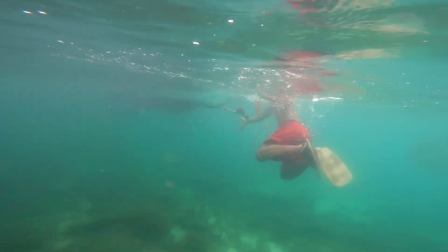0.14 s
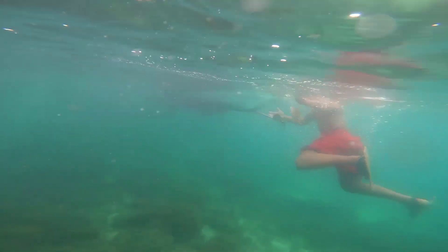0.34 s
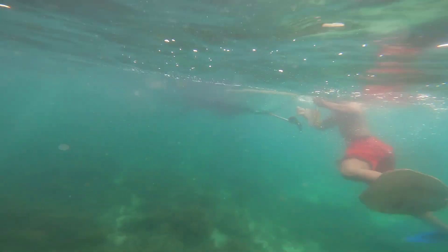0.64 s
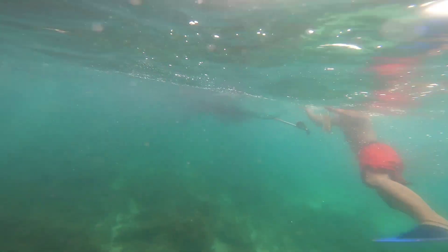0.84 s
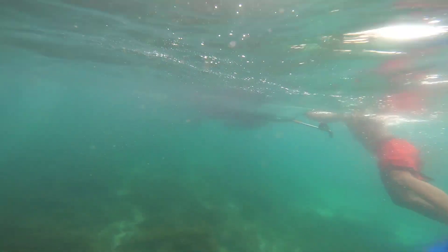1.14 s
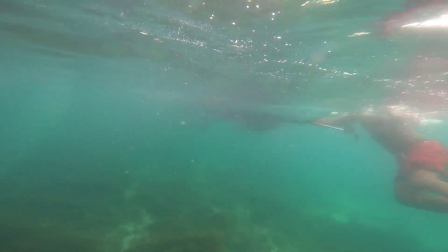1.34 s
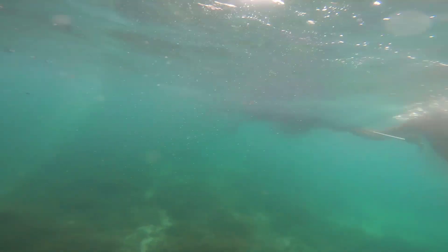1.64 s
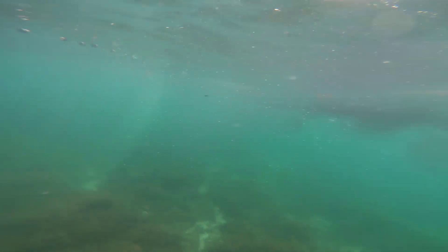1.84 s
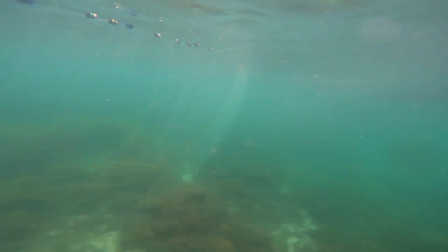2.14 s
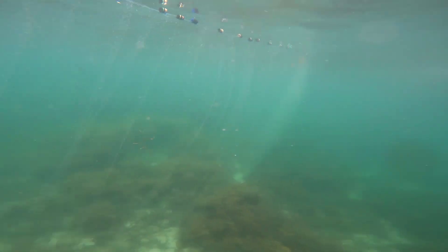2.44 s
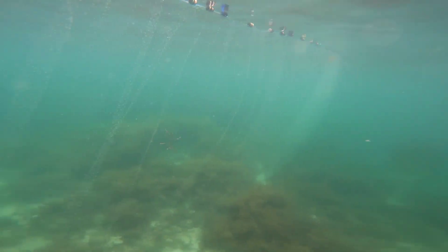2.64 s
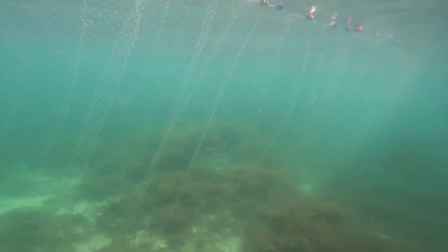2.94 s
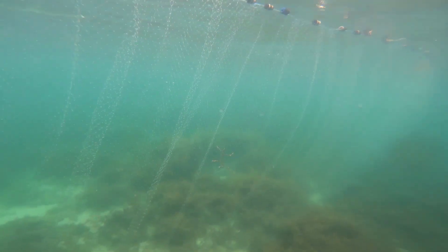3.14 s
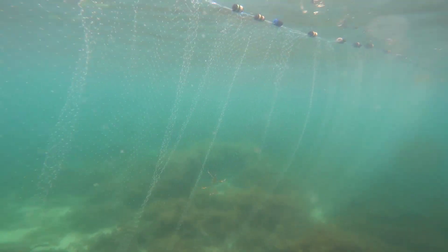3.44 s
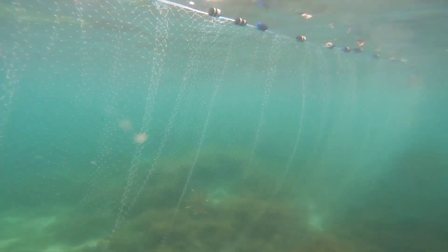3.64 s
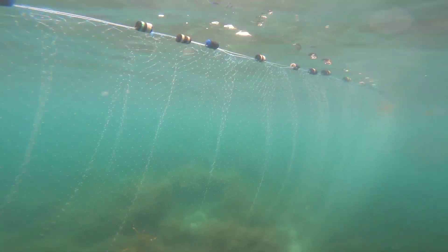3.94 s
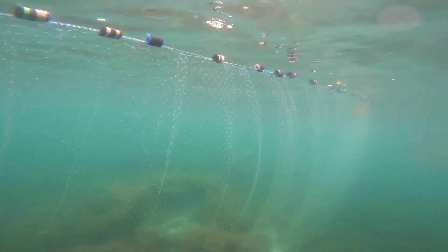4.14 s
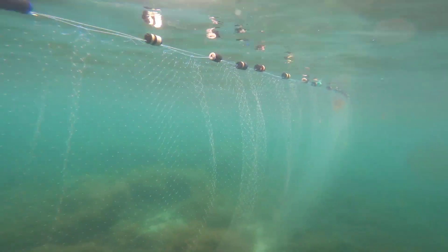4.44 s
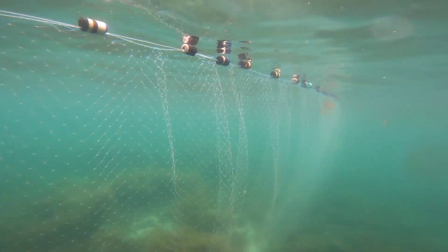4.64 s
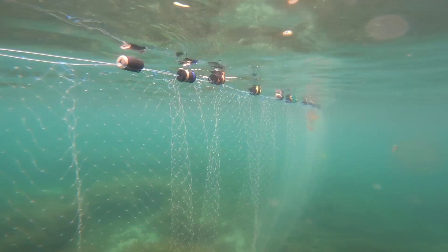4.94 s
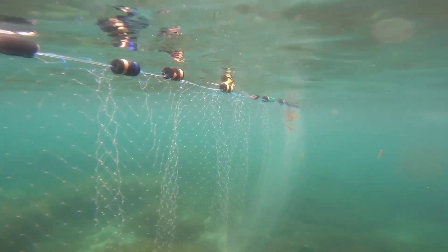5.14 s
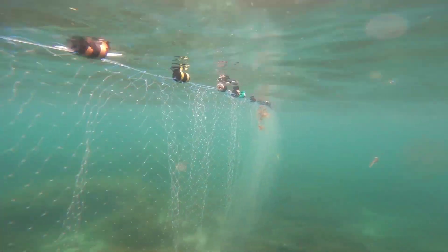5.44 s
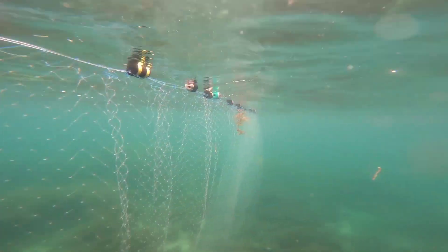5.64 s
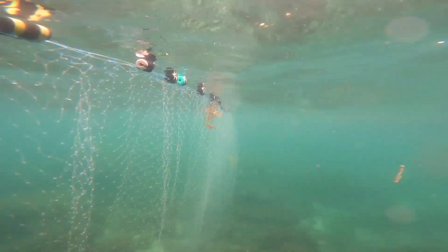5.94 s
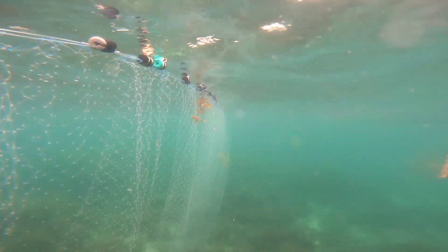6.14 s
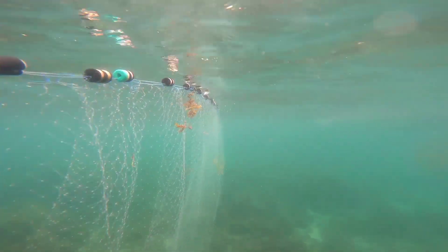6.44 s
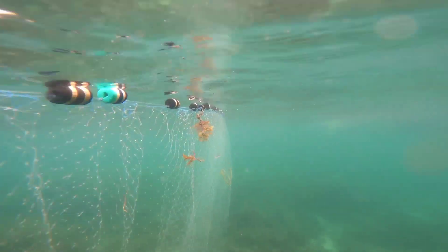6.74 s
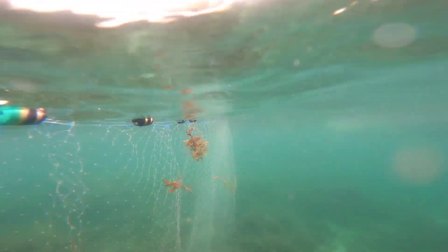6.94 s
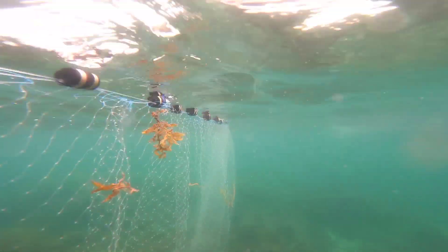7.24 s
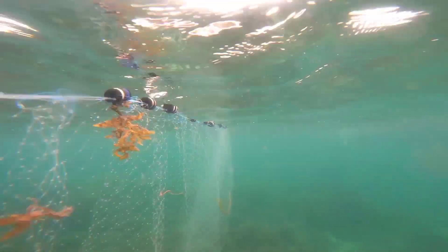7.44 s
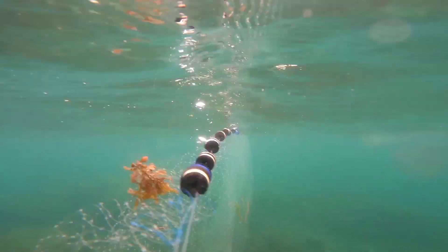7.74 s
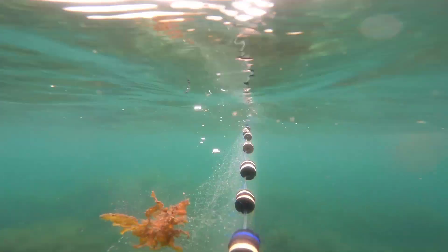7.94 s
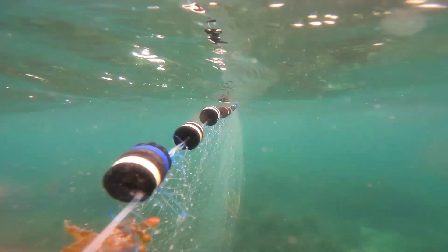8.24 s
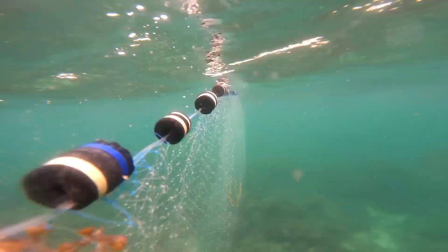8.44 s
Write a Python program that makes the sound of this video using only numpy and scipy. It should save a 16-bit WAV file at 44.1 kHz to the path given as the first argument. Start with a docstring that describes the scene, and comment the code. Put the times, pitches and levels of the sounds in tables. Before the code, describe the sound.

Heard from inside a camera's waterproof housing just under the sea surface, everything is muffled, boxy and close, slightly stronger on the left. A faint frying crackle from reef shrimp continues throughout, with scattered sharp snaps, notable near 1.1, 3.3 and 5.9 s. From 0 to 1.8 s water washes softly with a low hollow murmur. From 1.9 to 4.5 s surges grow stronger, a wavering drone around mid-low pitch swelling with fizz and pops; a deep gulp and soft bump come at 2.3 s, smaller gulps near 3.0 and 3.2. A longer surge runs 4.8 to 5.5, then a lull. At 6.1 s a rapid cluster of gulps, bubbles and thumps bursts out. It calms, then gurgles from 6.9. From 7.5 to 7.9 loose bubbles boil thickly, with the hardest double knock at 7.6. Low rumble, fizzy high bubbles and wet slaps follow at 8.0 to 8.5 s.

```python
"""Swim along a fishing net

A camera in a waterproof housing is swum along a net just under the sea surface. Pushed water (shaped noise)
sways and washes past; froth drones as filtered clicks ringing through the housing's resonances, over a wavering
sine. Snapping shrimp crackle on the reef below as filtered pulses. Waves slap the housing (soft blows), and air
bubbles and pockets gurgle past it as decaying, gliding sines."""
import sys
import numpy as np
from scipy import signal
from scipy.fft import rfft, irfft, next_fast_len
from scipy.io import wavfile
from scipy.ndimage import uniform_filter1d

SR = 44100
rng = np.random.default_rng(int(sys.argv[2]) if len(sys.argv) > 2 else 0)


def store_wav(level_fs):
    """Save 16-bit WAV to argv[1]."""
    pcm = np.round(np.clip(np.atleast_2d(level_fs), -1, 1) * 32767)
    wavfile.write(sys.argv[1], SR, pcm.T.astype(np.int16))


N = 378378
SHOT_SAMPLES = 8192  # longest blow, and length of the housing response


def from_db(db):
    """Decibels to amplitude gain."""
    return 10 ** (np.asarray(db) / 20)


def rms_one(x):
    """Scale to unit power."""
    return x / np.sqrt(np.mean(x ** 2) + 1e-20)


def panned(pan_db):
    """Left and right gains, pan_db apart."""
    return from_db(np.array([[pan_db], [-pan_db]]) / 2)


def cut(x, hz, kind, order=2):
    """Causal Butterworth low- or high-pass."""
    sos = signal.butter(order, np.clip(hz, 20, .45 * SR), kind, fs=SR, output="sos")
    return signal.sosfilt(sos, x + 1e-18)


def coloured(x, spectrum):
    """Give a steady sound a spectrum, interpolated over log frequency."""
    size = next_fast_len(N)
    hz, db = np.transpose(spectrum)
    log_hz = np.log(np.fft.rfftfreq(size, 1 / SR) + 1)
    gain = from_db(np.interp(log_hz, np.log(hz), db))
    return irfft(rfft(x, size) * gain, size)[..., :N]


def drift(rate_hz):
    """Slow random wander of unit rms."""
    knots = rng.standard_normal(int(rate_hz * N / SR) + 2)
    return rms_one(np.interp(np.arange(N) * rate_hz / SR, np.arange(len(knots)), knots))


def levelled(x, span_s):
    """Hold the power at 1 over a span, keeping the faster grain."""
    mean_power = np.mean(np.atleast_2d(x) ** 2, axis=0)
    power = uniform_filter1d(mean_power, max(int(span_s * SR), 1))
    return x / np.sqrt(np.abs(power) + 1e-20)


def grains(per_s, spread_db):
    """Random clicks of either sign, many small and a few large."""
    sizes = from_db(spread_db * np.minimum(rng.exponential(1, N), 5))
    return (rng.random(N) < per_s / SR) * sizes * rng.choice([-1, 1], N)


def banded_grains(low_hz, high_hz, width, per_s, spread_db, count):
    """Dense clicks, each ringing briefly in a narrow band of its own."""
    clicks = grains(per_s, spread_db)
    dealt = rng.integers(0, count, N)
    edge = 1 + abs(width)
    out = 0
    for k, hz in enumerate(np.geomspace(low_hz, high_hz, count)):
        band = signal.butter(1, [hz / edge, min(hz * edge, .45 * SR)], "band", fs=SR)
        out = out + signal.lfilter(*band, clicks * (dealt == k) + 1e-18)
    return out


def add(out, start_s, sound):
    """Mix a short sound in at a time."""
    at = max(round(start_s * SR), 0)
    out[:, at:at + sound.shape[-1]] += sound[:, :max(N - at, 0)]


def stray_times(count):
    """Irregular moments spread over the whole scene."""
    return (np.arange(count) + rng.random(count)) / count * N / SR


def envelope(t, rise_s, hold_s, fall_s):
    """Builds smoothly, holds, then falls 20 dB per fall_s."""
    rise = np.sin(np.pi / 2 * np.clip(t / rise_s, 0, 1)) ** 2
    return rise * from_db(-20 * np.maximum(t - rise_s - hold_s, 0) / fall_s)


def swell(start_s, rise_s, hold_s, fall_s, step=64):
    """Power of a push of water, in steps of a few samples."""
    t = np.arange(0, N, step) / SR - start_s
    return np.repeat(envelope(t, rise_s, hold_s, fall_s) ** 2, step)[:N]


def pushes(rows, calm_db):
    """Strength of a run of swells; powers add over a calm level."""
    power = sum(swell(*shape) * from_db(db) ** 2 for *shape, db in rows)
    return np.sqrt(from_db(calm_db) ** 2 + power)


def bubble(hz, swell_s, t60_s, glide):
    """A pinched-off bubble swells, rings down and slides a little in pitch."""
    t = np.arange(int((swell_s + 1.2 * t60_s) * SR) + 8) / SR
    rise = np.sin(np.pi / 2 * np.minimum(t / swell_s, 1)) ** 2
    level = rise * from_db(-60 * np.maximum(t - swell_s, 0) / t60_s)
    pitch_hz = hz * (1 + glide * np.tanh(t / t60_s))
    return level * np.sin(2 * np.pi * np.cumsum(pitch_hz) / SR)


def swarm(low_hz, high_hz, cycles, rise, spread_db, count):
    """Bubbles of random size and moment; most rise in pitch as they ring."""
    out = np.zeros((2, N))
    for when, size, strength, slide, side in rng.random((count, 5)):
        hz = low_hz * (high_hz / low_hz) ** size
        sound = bubble(hz, 2 / hz, cycles / hz, rise * (2 * slide - .5))
        gain = from_db(spread_db * min(-np.log(1 - strength), 4))
        add(out, when * N / SR, gain * sound * panned(10 * side - 2))
    return out


# housing resonances: (centre [Hz], width [Hz], relative level [dB], left minus right [dB], left lag [ms])
HOUSING_MODES = [(258, 60, -19.5, 2.0, 0), (411, 40, 7.5, 2.5, 0.0), (465, 25, -14, 4, 0.08),
                 (623, 67, -3.0, 3.5, 0.29), (1100, 50, -14, 13.5, 0.37), (1363, 350, -11, 0.5, -0.05),
                 (1510, 80, 2.5, 3, 0.093), (1860, 200, -14, 0.5, 0.19), (2233, 180, -4, 2.5, 0.022),
                 (2590, 690, -19.5, 11, 0.14), (3400, 980, -8.5, 2.5, 0.046),
                 (4487, 440, -8.5, 9.5, -0.011), (5830, 1500, -11.5, 1.5, -0.029),
                 (5800, 740, -25, 13, 0.095), (6790, 250, -7, -1.5, 0), (8740, 1000, -18.5, -3.5, 0.034),
                 (11750, 1500, -30, 3, .015)]


def housing_response(size):
    """Parallel resonances; each reaches the two microphones with its own balance and lag."""
    f = np.fft.rfftfreq(size, 1 / SR) + 1e-6
    out = np.zeros((2, len(f)), complex)
    for hz, width_hz, db, pan_db, lag_ms in HOUSING_MODES:
        mode = from_db(db) / (1 + 1j * (f - hz ** 2 / f) / width_hz)
        lag = np.exp(-1j * np.pi * f * lag_ms / 1000 * np.array([[1], [-1]]))
        out += mode * panned(pan_db) * lag
    delay = np.exp(-2j * np.pi * f * 16 / SR)  # 16 samples, room for the leading side
    return irfft(out * delay, size)


def through(x, body):
    """Sound passing through the housing wall."""
    return signal.oaconvolve(np.atleast_2d(x), body, axes=1)[:, :x.shape[-1]]


# surges of frothy water, one per stroke or wave: (start [s], rise [s], hold [s], 20 dB fall [s],
# relative wash [dB], deep churn [dB], small bubbles [dB], loose share of small bubbles [0-1])
WATER_SURGES = [(-0.1, .1, .3, .5, -48, -41.5, -52, .1), (0.68, .18, .6, .5, -45.5, -37.5, -46.5, .06),
                (1.5, .2, .25, .2, -51, -37.5, -47, .1), (1.9, .15, .18, .35, -42.5, -31, -45.5, .18),
                (2.26, .07, .39, .2, -53, -46, -45.5, .45), (2.72, .2, .2, .35, -39.5, -31.5, -49.5, .04),
                (3.1, .17, .22, .11, -42.5, -33.5, -49.5, .04), (3.66, .16, .1, .3, -42, -34.5, -49, .03),
                (3.92, .14, .17, .3, -40, -33.5, -45, .1), (4.2, .15, .35, .3, -45.5, -48, -48.5, .15),
                (4.81, .11, .64, .13, -47, -40.5, -46.5, .04), (5.72, .08, .25, .2, -54, -42, -53, .03),
                (6.07, .05, .07, .16, -38, -35, -38.5, .8), (6.25, .2, .3, .4, -56, -45, -51.5, .1),
                (6.85, .17, .21, .2, -45.5, -44, -45, .65), (7.34, .08, .1, .1, -56, -46, -46, .6),
                (7.48, .08, .12, .35, -46, -40, -35, .88), (7.75, .06, .08, .15, -44, -44, -43, .7),
                (7.98, .05, .12, .2, -52, -48, -51, .8), (8.18, .13, .19, .13, -43, -47, -43, .8)]
# between surges, relative: (wash [dB], deep churn [dB], small bubbles [dB])
CALM_WATER = (-55, -53, -58)


def surges(calm_loose_share=.02):
    """Strength of wash, churn, fizz and loose bubbles; overlapping surges add in power."""
    rows = np.array(WATER_SURGES)
    shapes = np.array([swell(*row[:4]) for row in rows] + [np.ones(N)])
    wash, churn, small = from_db(np.vstack([rows[:, 4:7], CALM_WATER]).T) ** 2
    loose = np.clip(np.append(rows[:, 7], calm_loose_share), 0, 1)
    return np.sqrt(np.array([wash, churn, small * (1 - loose), small * loose]) @ shapes)


# slow pressure swings as the camera is swung about:
# (start [s], rise [s], hold [s], 20 dB fall [s], level before rocking [dB])
PRESSURE_SWINGS = [(-0.1, .42, .06, .7, -38), (1.58, .16, .03, .7, -41), (3.0, .25, .35, .5, -47),
                   (3.8, .12, .04, .3, -40), (4.18, .2, .1, 2.0, -40), (6.0, .15, .15, .5, -46.5),
                   (6.65, .3, .3, .5, -43), (7.5, .1, .1, .3, -41), (7.98, .13, .06, .6, -29.5)]
# pressure noise: (frequency [Hz], relative density [dB/Hz])
SWAY_SPECTRUM = [(8, -28), (19, 4), (28, 0), (45, -5.5), (70, -12), (140, -40), (400, -77)]
# turbulence: (frequency [Hz], relative density [dB/Hz])
WASH_SPECTRUM = [(30, -37), (70, -3), (130, -1), (240, 3.5), (330, -1), (500, -16), (800, -26),
                 (2000, -112)]


def flow(wash_gain, wash_gain_db=1.0, lumpy_db=2.0, rocking_db=1.0, sway_calm_db=-50):
    """Pressure swings and turbulence as the housing is pushed through the water."""
    sway = levelled(coloured(rng.standard_normal(N), SWAY_SPECTRUM), span_s=0.05)
    sway = sway * from_db(rocking_db * drift(12))
    wash = coloured(rng.standard_normal(N), WASH_SPECTRUM) * from_db(lumpy_db * drift(40))
    wash = levelled(wash, span_s=0.21)
    sway = sway * pushes(PRESSURE_SWINGS, sway_calm_db)
    return (sway + wash * wash_gain * from_db(wash_gain_db)) * panned(1.0)


# big bubbles: (frequency [Hz], relative density [dB/Hz])
CHURN_SPECTRUM = [(100, -5), (250, -6.5), (390, 0.5), (480, -2), (630, -1), (850, -20), (1500, -33.5),
                  (3000, -37)]
# small bubbles: (frequency [Hz], relative density [dB/Hz])
FIZZ_SPECTRUM = [(500, -33), (850, -34), (1100, 5.5), (1500, -3), (1800, 1.5), (2300, -19), (4000, -26)]


def froth(body, churn_gain, fizz_gain, churn_gain_db=-1.3, drone_takes_over_db=-31.8,
          fizz_gain_db=-3.9, throb_db=3.0, drone_hz=402, waver=0.08, pulse_db=4.0, growth=0.71):
    """Clouds of bubbles pulse against the housing: big ones drone, small ones fizz."""
    churn = coloured(grains(per_s=1500, spread_db=0.0), CHURN_SPECTRUM)
    churn = levelled(through(churn * from_db(throb_db * drift(35)), body), span_s=0.09)
    fizz = through(coloured(grains(per_s=600, spread_db=3.5), FIZZ_SPECTRUM), body)
    fizz = levelled(fizz, span_s=0.11)
    # a dense cloud oscillates as one near the main resonance, and grows faster than the churn
    pitch_hz = drone_hz * (1 + waver * drift(70))
    cloud = np.sin(2 * np.pi * np.cumsum(pitch_hz) / SR) * from_db(pulse_db * drift(70))
    drone_gain = churn_gain * (churn_gain / from_db(drone_takes_over_db)) ** growth
    drone = levelled(cloud, span_s=0.22) * drone_gain * panned(2.7)
    churn = churn * churn_gain * from_db(churn_gain_db)
    return drone + churn + fizz * fizz_gain * from_db(fizz_gain_db)


# tiny loose bubbles: (frequency [Hz], relative density [dB/Hz])
SLOSH_SPECTRUM = [(350, -12), (600, 0), (850, -4), (1150, -1), (1550, -2), (1850, -19), (2300, -17),
                  (2800, -32), (4000, -38), (6000, -55)]


def gurgle(body, loose_gain, gain_db=-1.3, direct=0.38, slosh_db=-7.0, slosh_pan_db=3.0):
    """Crowds of loose bubbles blip close by, over a slosh of tiny ones that die within a few cycles."""
    loose = swarm(low_hz=600, high_hz=2050, cycles=33, rise=0.1, spread_db=2.5, count=3000)
    loose = direct * cut(loose, 1700, "low") + through(cut(loose, 900, "high"), body)
    loose = levelled(loose, span_s=0.075)
    slosh = banded_grains(low_hz=500, high_hz=4200, width=0.04, per_s=1800, spread_db=3.0, count=16)
    slosh = levelled(coloured(slosh, SLOSH_SPECTRUM), span_s=0.04) * panned(slosh_pan_db)
    return loose_gain * (from_db(gain_db) * loose + from_db(slosh_db) * slosh)


def blips(body, froth_gain, average_db=-54.5, follows=.9):
    """Stray bubbles plink faintly out of the froth, following most of its swing."""
    stray = swarm(low_hz=1050, high_hz=2100, cycles=38, rise=0.1, spread_db=2.0, count=300)
    stray = rms_one(through(stray, body))
    return stray * from_db(average_db) * (froth_gain / froth_gain.mean()) ** follows


# clouds of tiny bubbles shaken off the net:
# (start [s], rise [s], hold [s], 20 dB fall [s], relative level [dB])
NET_SHAKES = [(6.8, .3, .05, .25, -59), (7.52, .15, .02, .13, -53), (8.08, .05, .004, .04, -43),
              (8.17, .025, .05, .07, -41)]
# tiny bubbles on the housing: (frequency [Hz], relative density [dB/Hz])
SPRAY_SPECTRUM = [(1500, -36), (2300, -3), (3400, 2), (4700, -3), (6000, -18), (9000, -42)]


def spray(body, gain_db=-7.0, ringing=.7, prickle=0.45, calm_db=-66):
    """The net sheds tiny bubbles: some ring freely, the rest prickle against the housing."""
    fine = swarm(low_hz=3000, high_hz=5130, cycles=65, rise=0.08, spread_db=2.2, count=1000)
    fine = levelled(fine, span_s=0.15)
    prickles = through(coloured(grains(per_s=260, spread_db=4.0), SPRAY_SPECTRUM), body)
    prickles = levelled(prickles, span_s=0.06)
    strength = pushes(NET_SHAKES, calm_db) * from_db(gain_db)
    return (ringing * fine + prickle * prickles) * strength


def ticks(count, size, low_hz=2100, high_hz=9000, tilt_db_per_octave=-2.4, width=1.35,
          scatter=0.4, scatter_t60_s=0.016, apart=0.55, spread_db=2.8):
    """Small snaps from all over the reef; every path smears and colours its snap differently."""
    out, t = np.zeros((2, N)), np.arange(SHOT_SAMPLES // 8) / SR
    for hz in np.geomspace(low_hz, high_hz, size):
        noise = rng.standard_normal((count, 3, len(t)))
        tail = noise[:, :1] + apart * noise[:, 1:]  # shared part, then each side's own
        paths = (t == 0) + scatter * tail * from_db(-60 * t / scatter_t60_s)
        paths = cut(cut(paths, hz * width, "low", order=4), hz / width, "high")
        paths = paths * from_db(tilt_db_per_octave * np.log2(hz / low_hz))
        for path, (when, strength) in zip(paths, rng.random((count, 2))):
            gain = from_db(spread_db * min(-np.log(1 - strength), 4))
            add(out, when * N / SR, gain * path)
    return out


# far shrimp: (frequency [Hz], relative density [dB/Hz])
CRACKLE_SPECTRUM = [(600, -34), (1500, -7.5), (2300, 4), (4400, 1), (6000, -1.5), (6900, -3), (9000, -4),
                    (12000, -5), (16000, -37.5)]


def reef(body, level_db=-58.3, wander_db=1.2, near_db=-1.8, far_db=-4.2, apart=0.5, patchy_db=2.2):
    """Countless shrimp: the nearer ones tick, the far ones merge into a soft frying sound."""
    near = rms_one(through(ticks(count=95, size=12), body))
    far = banded_grains(low_hz=1800, high_hz=10000, width=0.2, per_s=1200, spread_db=5.0, count=9)
    far = rms_one(through(coloured(far, CRACKLE_SPECTRUM), body))
    wide = rms_one(through(coloured(rng.standard_normal((2, N)), CRACKLE_SPECTRUM), body))
    far = rms_one((far + apart * wide) * from_db(patchy_db * drift(25)))
    level = from_db(level_db + wander_db * drift(5))
    return level * (from_db(near_db) * near + from_db(far_db) * far)


def stray_snaps(count, peak_db=-41, spread_db=1.5, dull_hz=2800, bright_hz=8500, low_share=.2):
    """Snaps from a little further off, each of its own strength and brightness."""
    top_hz = dull_hz * (bright_hz / dull_hz) ** rng.random(count)
    db = peak_db + spread_db * rng.standard_normal(count)
    return list(zip(stray_times(count), db, top_hz, low_share * top_hz))


# nearest shrimp: (time [s], relative peak above 2.5 kHz [dB], upper edge [Hz], lower edge [Hz])
NEAR_SNAPS = [(0.033, -27, 5400, 900), (0.365, -28.5, 7700, 1400), (0.485, -32.5, 5900, 1200),
              (0.574, -34, 8500, 1500), (0.797, -37, 4000, 900), (0.924, -35, 7700, 1450),
              (0.9818, -29, 5600, 2600), (1.0697, -17, 4700, 2400), (1.1932, -33, 8000, 1450),
              (1.294, -37, 3600, 1300), (1.475, -28.5, 10000, 4700), (1.5253, -27.5, 4400, 4300),
              (1.5577, -33, 9400, 1700), (1.919, -33, 7700, 1400), (1.949, -27.5, 5600, 2700),
              (2.148, -29.5, 10000, 1900), (2.256, -33.5, 9400, 1700), (2.3078, -37, 3200, 900),
              (2.388, -35, 4000, 1000), (2.4223, -28, 6200, 1100), (2.4457, -32.5, 6200, 1100),
              (2.5196, -31, 4400, 800), (2.7004, -30, 7300, 1300), (2.7191, -29, 7700, 1400),
              (2.7657, -34, 3700, 700), (2.802, -34, 7300, 1600), (2.9807, -28, 10000, 3800),
              (3.1895, -34, 3500, 1100), (3.2535, -28.5, 3800, 900), (3.305, -26, 4800, 2500),
              (3.3167, -31, 9400, 1700), (3.3298, -17, 7500, 1700), (3.5299, -19.5, 3000, 1500),
              (3.6102, -33, 6200, 1100), (3.655, -25, 4900, 1700), (3.661, -27.5, 5500, 1000),
              (3.7197, -27.5, 5200, 950), (3.7834, -30, 4400, 800), (3.8625, -29, 2700, 2800),
              (4.084, -24, 4300, 2000), (4.288, -31, 4100, 750), (4.3227, -28.5, 4400, 1900),
              (4.7216, -34.5, 6900, 1250), (4.7373, -25.5, 6100, 4500), (4.808, -34, 6600, 1200),
              (4.9077, -28, 5200, 950), (5.8273, -33, 7300, 1300), (4.951, -29.5, 3700, 670),
              (5.7317, -32, 7700, 1400), (5.808, -35, 8000, 3000), (5.9185, -17, 3300, 3000),
              (5.938, -34, 9000, 5000), (6.2471, -25.5, 10000, 5000), (6.322, -32, 7700, 1500),
              (6.6686, -26.5, 8000, 1450), (6.945, -32.5, 10000, 3800), (7.1592, -31, 10000, 3800),
              (7.283, -31, 10000, 4300), (7.3026, -24.5, 7000, 4500), (7.3546, -30.5, 9400, 5000),
              (7.4779, -27.5, 4100, 3100), (7.743, -19.5, 6500, 6000), (8.15, -23.5, 7000, 5500),
              (8.2232, -24.5, 4100, 4800), (8.3713, -33, 10000, 4500), (8.275, -31, 5000, 3000),
              (8.4642, -28, 2600, 1700), (8.516, -35, 4500, 2000)]


def snaps(body, gain_db=1.2, scatter=0.125, scatter_t60_s=0.018, echo=.3, echo_spread_ms=.9):
    """A collapsing cavity gives one sharp pulse; surface and reef scatter a short tail after it."""
    out, t = np.zeros((2, N)), np.arange(SHOT_SAMPLES // 4) / SR
    rows = stray_snaps(count=18) + NEAR_SNAPS
    noises = rng.standard_normal((len(rows), 3, len(t)))
    for (start_s, db, top_hz, low_hz), noise in zip(rows, noises):
        tail = noise[0] + .5 * noise[1:]
        pulse = (t == 0) + scatter * tail * from_db(-60 * t / scatter_t60_s)
        # the sea surface mirrors the pulse upside down
        lag = 3 + int(rng.random() * echo_spread_ms / 1000 * SR)
        pulse = pulse - echo * np.pad(pulse, ((0, 0), (lag, 0)))[:, :len(t)]
        snap = through(cut(cut(pulse, top_hz, "low", order=3), low_hz, "high"), body)
        peak = np.abs(cut(snap.mean(axis=0), 2500, "high")).max()
        add(out, start_s, from_db(db + gain_db) * snap / peak)
    return out


# loudest single bubbles: (time [s], pitch before glide [Hz], level before roughening [dB], t60 [s])
SINGLE_BUBBLES = [(.541, 1870, -44, .04), (.555, 1370, -41, .03), (.572, 1100, -40, .08),
                  (1.18, 620, -35, .06), (1.360, 187, -30.5, .14), (1.388, 206, -30.5, .15),
                  (1.428, 1340, -35, .035), (1.497, 1413, -29, .043), (2.018, 603, -36, .08),
                  (2.089, 620, -31, .08), (2.091, 1230, -35, .03), (2.16, 1400, -36, .03),
                  (2.266, 3750, -39, .02), (2.328, 1413, -33, .06), (2.352, 1060, -35, .04),
                  (2.477, 1164, -33, .07), (2.595, 1400, -37, .05), (2.635, 3330, -40, .025),
                  (2.652, 1450, -34, .05), (2.668, 1100, -34, .046), (2.684, 950, -35, .04),
                  (2.768, 1400, -28.5, .02), (4.288, 1450, -22.5, .031), (4.381, 1490, -40, .05),
                  (4.415, 620, -37, .05), (4.63, 1100, -42, .04), (4.722, 635, -36, .06),
                  (4.938, 1550, -30, .04), (5.027, 2260, -36, .032), (5.201, 1515, -27.5, .08),
                  (6.062, 1020, -39, .03), (6.068, 3720, -41, .014), (6.088, 1530, -35, .05),
                  (6.105, 1030, -23, .022), (6.107, 1500, -25, .05), (6.111, 620, -20.5, .05),
                  (6.133, 720, -26, .025), (6.165, 2230, -37.5, .025), (6.171, 1490, -30, .07),
                  (6.181, 1510, -25, .045), (6.231, 660, -32, .1), (6.630, 630, -36.5, .08),
                  (6.707, 618, -28, .13), (6.945, 3120, -44, .025), (6.986, 2150, -42, .03),
                  (7.172, 920, -36, .08), (7.257, 3270, -44, .025), (7.264, 1850, -39, .025),
                  (7.365, 1100, -36, .02), (7.432, 760, -27, .028), (7.452, 1550, -34, .04),
                  (7.503, 2080, -37, .025), (7.505, 650, -33, .05), (7.523, 1280, -31, .03),
                  (7.536, 1067, -20, .055), (7.566, 2050, -32, .025), (7.575, 627, -28, .15),
                  (7.623, 1380, -19, .027), (7.634, 1100, -24, .04), (7.650, 700, -25, .04),
                  (7.653, 1530, -30, .05), (7.662, 900, -27, .03), (7.669, 2200, -35, .025),
                  (7.696, 1050, -29, .02), (7.699, 780, -30, .03), (7.745, 1480, -29, .05),
                  (7.769, 1184, -32, .07), (7.779, 642, -24, .1), (7.816, 1750, -36, .03),
                  (7.837, 1470, -28, .045), (7.858, 1380, -30, .06), (7.883, 1140, -24, .05),
                  (7.926, 560, -35, .04), (8.029, 620, -36, .025), (8.029, 1400, -37, .03),
                  (8.06, 1260, -27, .025), (8.062, 770, -26.5, .08), (8.062, 2190, -35, .03),
                  (8.128, 3560, -38, .025), (8.149, 3180, -33, .018), (8.185, 4600, -34, .035),
                  (8.186, 2330, -41, .08), (8.215, 1750, -39, .025), (8.232, 3390, -37, .03),
                  (8.256, 4450, -35, .025), (8.290, 1147, -18, .05), (8.292, 2250, -31, .03),
                  (8.298, 938, -23.5, .11), (8.366, 1300, -34, .02), (8.394, 1020, -33, .09),
                  (8.402, 2050, -36, .035), (8.441, 1350, -31, .05), (8.462, 1119, -16.5, .06),
                  (8.463, 3230, -25, .018), (8.491, 1400, -30, .03)]


def bubbles(swell_s_at_1khz=.003, swell_law=1.1, glide=0.035, pan_db=4.0, rough=0.26,
            wobble_share=0.2, wake_db=-21, wake_t60_s=0.1, wake_width=1.25):
    """The largest and nearest bubbles: each rings, roughened as its shape wobbles, and leaves a wake."""
    out, t = np.zeros((2, N)), np.arange(SHOT_SAMPLES) / SR
    noises = rng.standard_normal((len(SINGLE_BUBBLES), SHOT_SAMPLES))
    for (start_s, hz, db, t60_s), noise in zip(SINGLE_BUBBLES, noises):
        # bigger, deeper bubbles take longer to pinch off
        swell_s = swell_s_at_1khz * (1000 / hz) ** swell_law
        ring = bubble(hz, swell_s, t60_s, glide * noise[-1])
        wobble_at = np.arange(len(ring)) * wobble_share * hz / SR
        wobble = np.interp(wobble_at, np.arange(64), noise[-64:])
        # wake of fragments: noise around the pitch
        wake = cut(cut(noise, hz * wake_width, "low", order=5), hz / wake_width, "high", order=3)
        wake = rms_one(wake) * from_db(wake_db - 60 * t / wake_t60_s)
        for sound in (ring * (1 + rough * wobble), wake):
            add(out, start_s, from_db(db) * sound * panned(pan_db))
    return out


# loudest bursting bubbles: (time [s], peak [dB], pitch [Hz])
BURSTS = [(1.1835, -33, 1500), (1.427, -32, 1400), (1.497, -29, 1400), (1.949, -33, 2100),
          (2.7164, -32, 1700), (2.7665, -30, 2000), (3.0849, -31, 1700), (3.1623, -25, 1650),
          (3.2579, -27, 1550), (3.9756, -32, 1500), (4.1044, -26.5, 1400), (4.1357, -31, 1500),
          (4.951, -30, 2100), (5.2325, -27, 1350), (6.9622, -32, 1500), (7.213, -31, 1400)]


def pops(body, stray_hz=1500, stray_scatter=.15, stray_db=-38, t60_s=0.011, crack=1.5,
         crack_t60_s=0.032, width=1.3, direct=0.4):
    """A bursting bubble rings only briefly, with a small spatter around its pitch."""
    out, t = np.zeros((2, N)), np.arange(SHOT_SAMPLES // 4) / SR
    rows = [(start_s, stray_db, stray_hz * (1 + stray_scatter * rng.standard_normal()))
            for start_s in stray_times(count=12)] + BURSTS
    for (start_s, db, hz), noise in zip(rows, rng.standard_normal((len(rows), len(t)))):
        ring = np.sin(2 * np.pi * hz * t) * from_db(-60 * t / t60_s)
        burst = ring + crack * noise * from_db(-60 * t / crack_t60_s)
        burst = cut(cut(burst, hz / width, "high", order=3), hz * width, "low", order=5)
        pop = through(burst, body) + direct * burst
        add(out, start_s, from_db(db) * pop / np.abs(pop.mean(axis=0)).max())
    return out


# large air pockets: (start [s], rise [s], hold [s], 20 dB fall [s], mean pitch [Hz], level [dB])
AIR_POCKETS = [(2.275, .005, .004, .014, 443, -12), (2.47, .02, .03, .03, 410, -31),
               (3.002, .01, .006, .012, 405, -19.5), (3.24, .01, .006, .012, 405, -24),
               (6.027, .014, .006, .018, 420, -28), (6.06, .005, .02, .012, 405, -25.5),
               (6.105, .014, .004, .01, 400, -13), (6.128, .007, .002, .01, 425, -13),
               (6.139, .012, .012, .008, 408, -12), (6.168, .02, .005, .013, 405, -17.5),
               (6.205, .025, .008, .014, 425, -21), (7.678, .008, .021, .04, 432, -20.5),
               (7.777, .01, .012, .065, 439, -24), (8.133, .01, .006, .012, 425, -30.5),
               (8.404, .007, .005, .02, 420, -32)]


def pockets(waver=0.025, pan_db=2.7):
    """A trapped pocket of air swells into a deep wavering gulp and stops when it slips off."""
    out, t = np.zeros((2, N)), np.arange(SHOT_SAMPLES) / SR
    all_bends = rng.standard_normal((len(AIR_POCKETS), 20))
    for (start_s, rise_s, hold_s, fall_s, hz, db), bends in zip(AIR_POCKETS, all_bends):
        bend = np.interp(t, np.linspace(0, t[-1], len(bends)), bends)
        tone = np.sin(2 * np.pi * np.cumsum(hz * (1 + waver * bend)) / SR)
        gulp = envelope(t, rise_s, hold_s, fall_s) * tone
        add(out, start_s, from_db(db) * gulp * panned(pan_db))
    return out


# slaps and bumps on the housing: (time [s], peak [dB], hardness [Hz], t60 of contact damping [s])
HOUSING_KNOCKS = [(2.278, -20, 220, .3), (6.106, -16, 750, .15), (6.119, -13.5, 260, .15),
                  (6.133, -14, 900, .06), (6.181, -25, 1000, .1), (6.91, -27, 104, .06),
                  (7.123, -25, 900, .06), (7.237, -22, 1300, .06), (7.537, -19.5, 1450, .15),
                  (7.567, -22.5, 2500, .06), (7.593, -19, 700, .06), (7.6222, -7, 540, .06),
                  (7.6348, -7.5, 420, .13), (7.862, -30, 110, .15), (8.245, -22, 700, .15),
                  (8.291, -16, 1200, .2), (8.297, -17.5, 1300, .06), (8.394, -26, 1800, .15),
                  (8.410, -26, 600, .15), (8.459, -17, 170, .3), (8.464, -22, 1520, .1)]


def knocks(body, splash=0.039, splash_t60_s=0.07, thud_db=-13.5, thud_hz=190, slap_db=-19):
    """A soft blow with a short splash rings the housing, shoves it as a whole and damps it again."""
    out, t = np.zeros((2, N)), np.arange(SHOT_SAMPLES) / SR
    noises = rng.standard_normal((len(HOUSING_KNOCKS), SHOT_SAMPLES))
    for (start_s, db, hardness_hz, t60_s), noise in zip(HOUSING_KNOCKS, noises):
        force = (t == 0) + splash * noise * from_db(-60 * t / splash_t60_s)
        force = cut(force, hardness_hz, "low", order=3)
        thud = from_db(thud_db) * cut(cut(force, thud_hz, "low"), 33, "high")
        slap = from_db(slap_db) * cut(force, 600, "high")
        blow = (through(force, body) + thud + slap) * from_db(-60 * t / t60_s)
        add(out, start_s, from_db(db) * blow / np.abs(blow.mean(axis=0)).max())
    return out


def scene():
    """Water, air and shrimp as heard from inside the housing."""
    body = housing_response(SHOT_SAMPLES)
    wash, churn, fizz, loose = surges()
    water = flow(wash) + froth(body, churn, fizz) + gurgle(body, loose) + blips(body, fizz) + spray(body)
    return water + bubbles() + pockets() + pops(body) + knocks(body) + snaps(body) + reef(body)


def record(dry, rolloff_hz=14500, cutoff_hz=15400):
    """The treble rolls off and the top is cut steeply."""
    steep = signal.ellip(10, .1, 80, cutoff_hz, fs=SR, output="sos")
    return signal.sosfilt(steep, cut(dry, rolloff_hz, "low", order=2))


dry = scene()
out = record(dry)
store_wav(out)
```